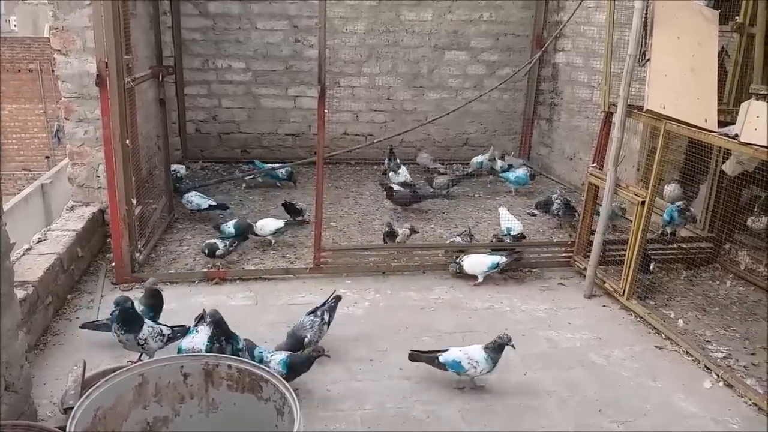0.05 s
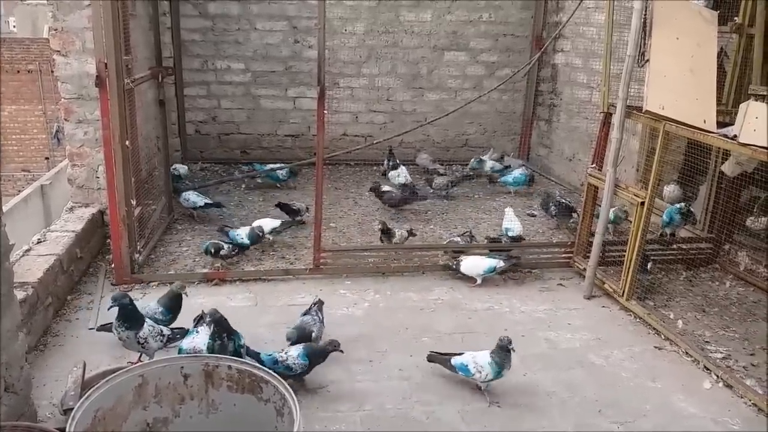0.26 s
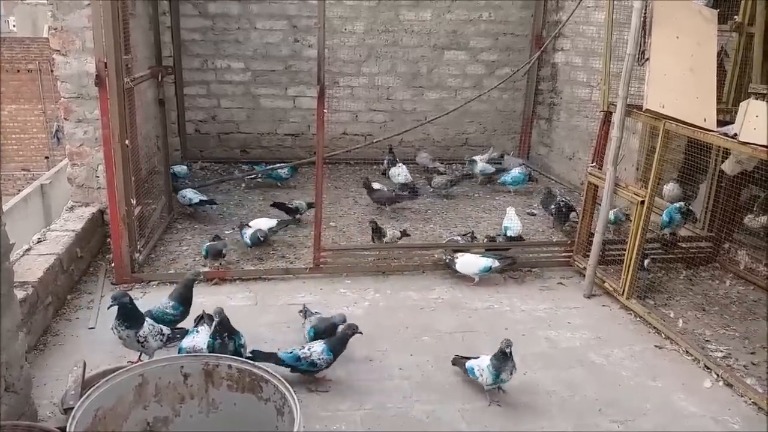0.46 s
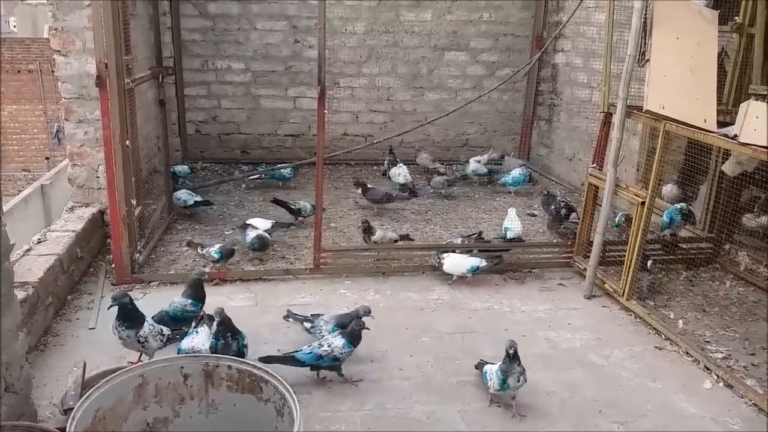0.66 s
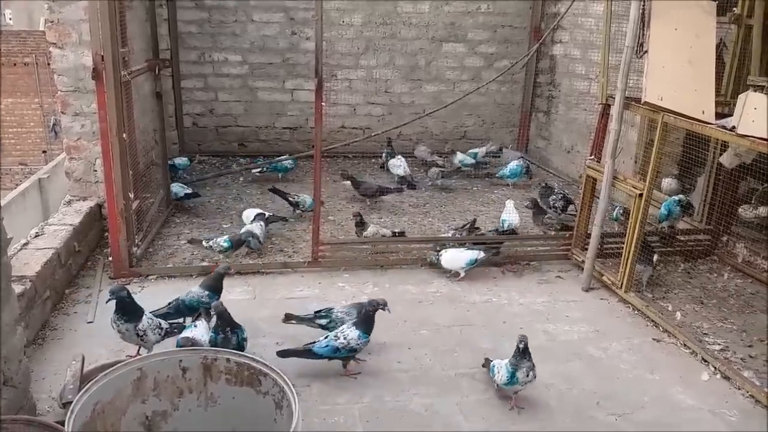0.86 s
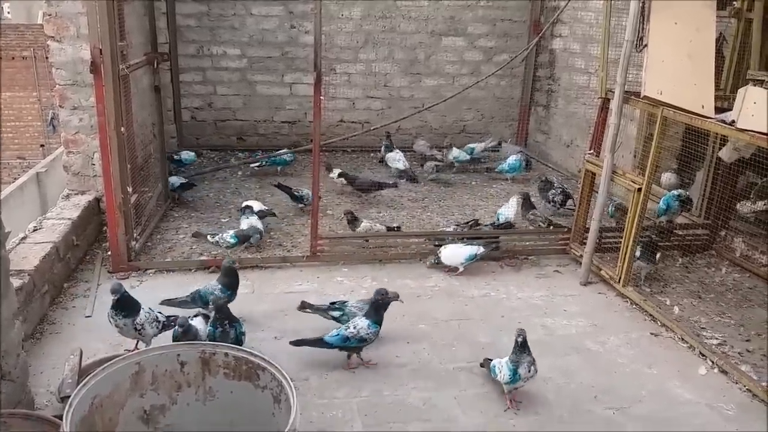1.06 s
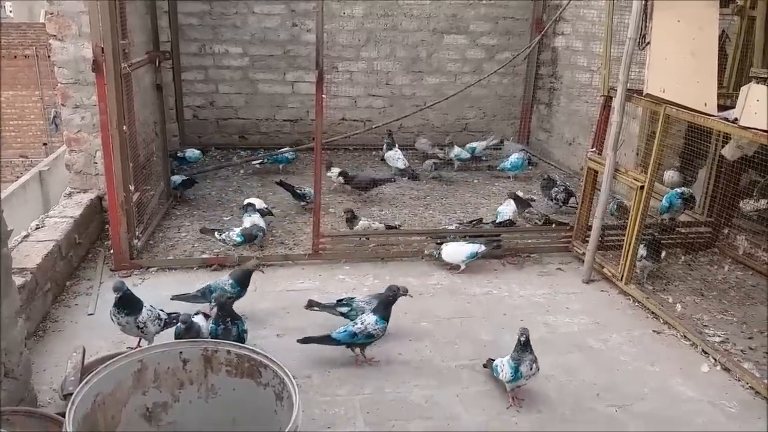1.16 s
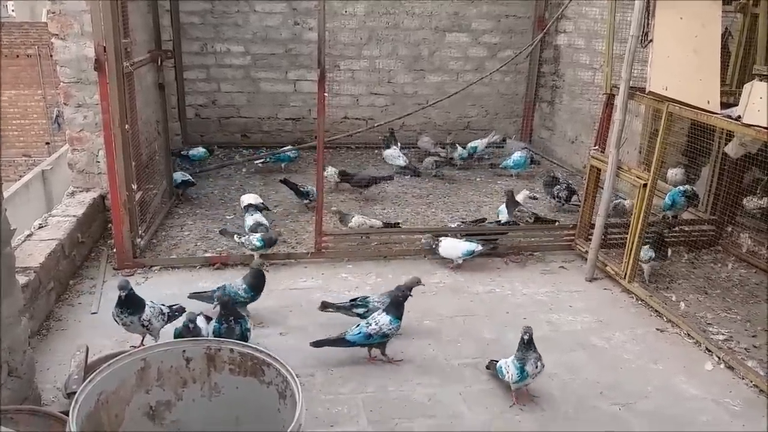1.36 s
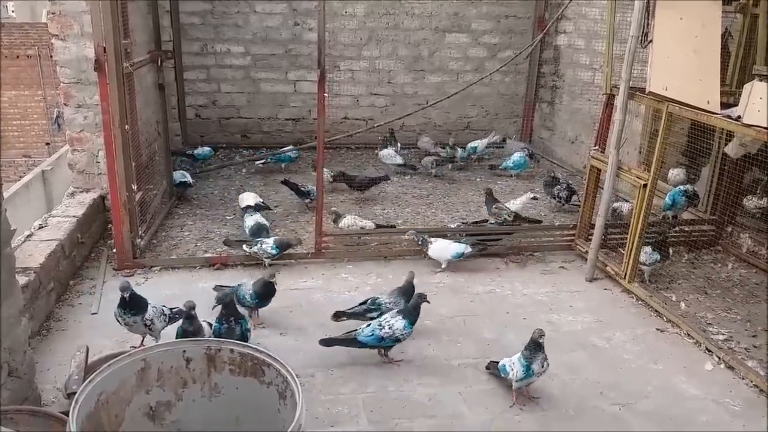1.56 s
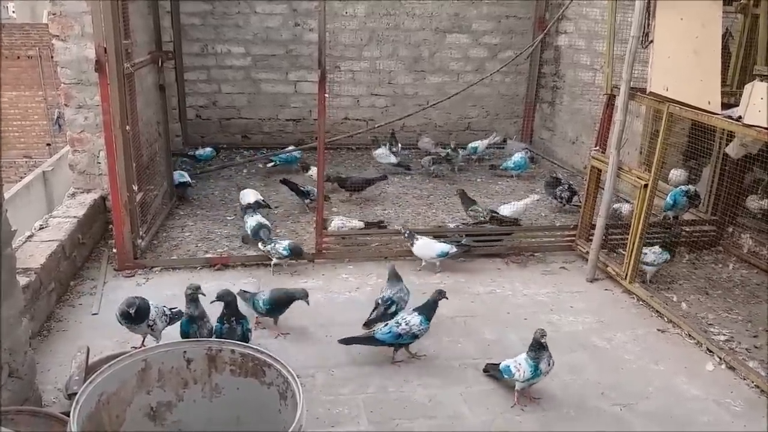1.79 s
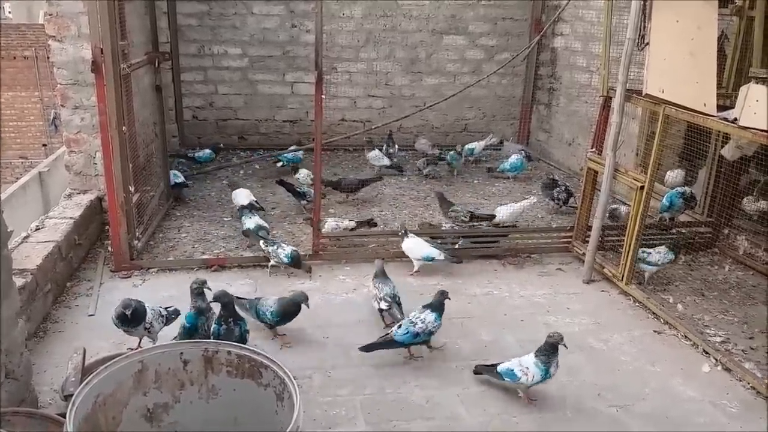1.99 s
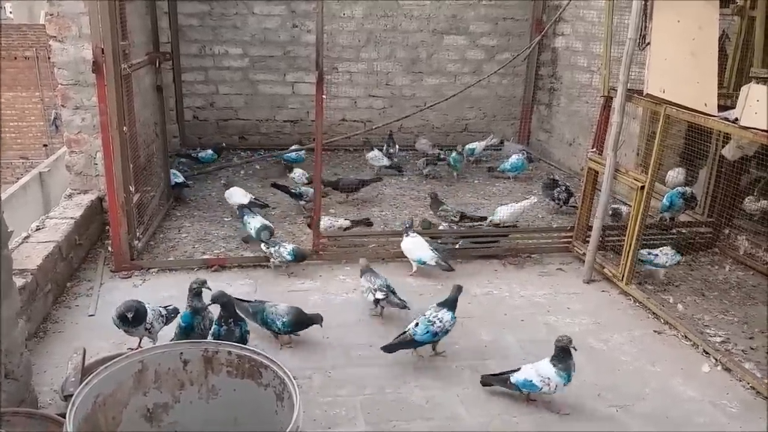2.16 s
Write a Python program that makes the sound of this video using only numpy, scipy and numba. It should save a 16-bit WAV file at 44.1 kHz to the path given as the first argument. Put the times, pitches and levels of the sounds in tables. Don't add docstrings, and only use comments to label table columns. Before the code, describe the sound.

Pigeons coo throughout, short grunts first, then a fluttering rolled coo and lower rolls; faint swishes of wings and feet, far chirps mostly right, dull motor and town rumble, short wall echo, slightly degraded treble, abrupt click.

```python
import sys
import numpy as np
from scipy import signal
from scipy.fft import rfft, irfft
from scipy.io import wavfile
from scipy.ndimage import uniform_filter1d
from numba import njit

SR = 44100
rng = np.random.default_rng(int(sys.argv[2]) if len(sys.argv) > 2 else 0)


def master_out(mix):
    frames = np.transpose(np.atleast_2d(mix))
    ceiling = np.clip(frames, -1, 1)
    pcm = np.round(ceiling * 32767).astype(np.int16)
    wavfile.write(sys.argv[1], SR, pcm)


def invert_db(x):
    u = np.asarray(x, float) / 20
    return 10 ** u


N = 98387
T = np.arange(N) / SR

# (time [s], level [dB])
MOTOR_THROB = [
    (0, -54.5),
    (0.298, -45),
    (.66, -47.5),
    (.75, -43.5),
    (.95, -47.5),
    (1.1, -39.5),
    (1.6, -45),
    (1.721, -57.5),
    (1.9, -43),
    (2.18, -53),
]


@njit
def svf(x, hz, width):
    y, band, low = np.empty(len(x)), 0., 0.
    g, damping = np.tan(np.pi * hz / SR), width / hz
    for i in range(len(x)):
        v = (band + g * (x[i] - low)) / (1 + g * (g + damping))
        band = 2 * v - band
        low = low + 2 * g * v
        y[i] = damping * v
    return y


def band_noise(hz):
    return svf(svf(rng.standard_normal(N), hz, hz / 3), hz, hz / 2)


def walk(rate, size=N):
    hold = int(SR / rate)
    steps = np.repeat(rng.standard_normal(size // hold + 1), hold)
    return 1.305 * uniform_filter1d(uniform_filter1d(steps, hold), hold)[:size]


def unit(x):
    return x / np.sqrt(np.mean(x ** 2))


def colour(table, hz):
    table_hz, table_db = np.array(table).T
    return np.interp(np.log(hz), np.log(table_hz), table_db)


def glide_tone(hz):
    return np.sin(2 * np.pi * np.cumsum(hz) / SR)


def throat_notes(table, attack, release, sag_db, roll_hz, depth, wander, flutter_db):
    overtone_db, restart_rad = -37, 1.83
    out = np.zeros(N + SR)
    for start, length, start_hz, end_hz, db in table:
        n = int(length * SR)
        u = np.arange(n) / n
        edge = np.clip(np.minimum(u / attack, (1 - u) / release), 0, 1)
        beats = 0.32 + np.cumsum(roll_hz * (1 + 0.198 * walk(41.0, size=n))) / SR
        restart = rng.standard_normal(200)[beats.astype(int)]
        slip = uniform_filter1d(depth * restart_rad * restart, size=150)
        hz = (start_hz + (end_hz - start_hz) * u) * (1 + wander * walk(66.3, size=n))
        phase = slip + 2 * np.pi * np.cumsum(hz) / SR
        valve = 1 - depth * np.cos(np.pi * beats) ** 2
        tone = np.sin(phase) + invert_db(overtone_db) * np.sin(2 * phase)
        gain = invert_db(db + 5.5 + sag_db * u ** 0.78 + flutter_db * walk(41.4, size=n))
        i = max(int(start * SR), 0)
        out[i:i + n] += tone * valve * gain * np.sin(edge * np.pi / 2) ** 2
    return out[:N]


def coos():
    # (start [s], length [s], start pitch [Hz], end pitch [Hz], level [dB])
    swoop_table = [(0, 0.044, 502.5, 369, -45), (.168, 0.051, 479.7, 352, -39), (.21, 0.05, 285, 264, -42),
                   (.37, 0.14, 240, 249.3, -42.5), (.37, .06, 712, 712, -54.5),
                   (.44, 0.046, 669, 652, -49.5), (.61, 0.084, 539, 531, -50.5),
                   (.69, 0.071, 519.5, 471, -48.5), (.77, .075, 640, 710, -55), (.87, 0.058, 418, 458, -50),
                   (1.45, 0.034, 703, 714, -49.5), (1.58, .1, 280, 233, -46), (1.6, 0.072, 479, 429, -42.5),
                   (1.645, .075, 410, 330, -49), (1.68, 0.11, 568, 560, -59.5), (1.77, .045, 540, 480, -47),
                   (1.795, .095, 475, 400, -32)]
    grunt_table = [
        (.198, 0.044, 348.6, 297, -32.5),
        (.279, 0.024, 340, 320, -40),
        (1.032, 0.032, 325, 310, -32),
        (1.041, .05, 430, 429, -41),
        (1.06, .055, 344, 336, -37.5),
        (1.146, 0.073, 362, 339, -29.5),
        (1.146, 0.074, 452, 440, -45),
        (1.842, .045, 385, 350, -29),
    ]
    quick_table = [(.24, 0.083, 370, 300, -41.5), (.235, .08, 450, 470, -41), (.34, .095, 400, 480, -41.5),
                   (.445, .069, 460, 436, -41.5), (0.41, 0.058, 370, 340, -44), (.55, .07, 275, 310, -41.5),
                   (.71, 0.083, 300, 314, -45.5), (.57, .054, 460, 457, -48), (1.44, .15, 430, 440, -46.5),
                   (1.872, .11, 290, 275, -34.5), (1.975, .09, 310, 290, -31.5),
                   (2.055, .085, 285, 280, -34), (2.14, 0.068, 285, 285, -39), (1.885, .11, 410, 410, -37),
                   (1.99, 0.079, 400, 400, -42), (2.07, .13, 420, 430, -41.5), (1.89, 0.34, 530, 535, -52),
                   (.29, .08, 290, 340, -48), (.61, .1, 350, 320, -50), (.77, .1, 380, 400, -52),
                   (.96, .075, 430, 400, -52), (1.57, .12, 400, 380, -50)]
    slow_table = [
        (.508, 0.13, 375, 375, -36),
        (.70, 0.12, 389.6, 369, -40),
        (.86, 0.12, 280, 335, -45),
        (1.23, 0.076, 384, 356, -49.5),
        (1.345, 0.06, 320, 340, -44),
        (1.55, .085, 325, 309, -39),
    ]
    beat_table = [
        (1.393, 0.019, 366, 360, -29.5),
        (1.411, 0.02, 365, 363, -34),
        (1.438, .024, 360, 350, -32),
        (1.462, .022, 344, 340, -32),
        (1.487, 0.025, 323, 315, -33),
        (1.51, 0.02, 320, 318, -34),
        (1.528, 0.023, 327, 318, -37.5),
        (1.877, .016, 320, 290, -30),
    ]
    wander = 0.024
    voice = throat_notes(swoop_table, .55, 0.21, 0, 50, 0.49, wander / 2, 0.74)
    voice += throat_notes(grunt_table, 0.092, .15, -12.5, 55, 0.31, wander / 3, 1.0)
    voice += throat_notes(quick_table, 0.068, 0.22, 0.41, 61.87, 0.6, .012, 1.3)
    voice += throat_notes(slow_table, .07, .12, -9, 42, .7, .013, 1.6)
    voice += throat_notes(beat_table, 0.26, .45, -4, 30, 0, wander / 3, 0.55)
    throat = signal.butter(4, (225, 780), "bandpass", fs=SR, output="sos")
    return signal.sosfilt(throat, voice)


def motor():
    # (pitch [Hz], level [dB])
    tone_table = [(62, -11.5), (102, 0.5), (123, -5), (146, -9.5)]
    s, db = np.array(MOTOR_THROB).T
    hum = 0
    for hz, tone_db in tone_table:
        flicker = invert_db(tone_db + 1.83 * walk(14.15))
        hum = hum + flicker * glide_tone(hz * (1 + 0.0412 * walk(12)))
    return unit(hum) * invert_db(np.interp(T, s, db) + 1.23)


def town():
    # (pitch [Hz], level [dB per Hz])
    town_colour = [(36, -36.5), (60, 2), (110, -0.5), (200, -3), (400, -10.5), (1000, -20.5), (5000, -31),
                   (9000, -40), (15800, -36)]
    out = 0
    swell = walk(4.2) + 0.12 * np.interp(T, *np.array(MOTOR_THROB).T)
    tilt = invert_db(np.array([[.8], [-.8]]))
    for hz in 32 * 2 ** np.arange(0, 9, .4):
        mid = band_noise(hz) * tilt
        side = np.clip(hz / 660.0, .25, 1) * band_noise(hz) * np.array([[1], [-1]])
        db = colour(town_colour, hz) + 1.63 * swell + 1.08 * walk(7.4)
        out = out + invert_db(db) * (mid + side)
    return unit(out) * invert_db(-48.5)


def rustles():
    # (peak time [s], length [s], level [dB], brightness [dB per octave])
    swishes = np.array([(0.237, 0.043, -67, 4), (0.405, 0.088, -65.5, -3), (0.478, 0.13, -63.5, -1),
                        (0.561, 0.082, -58.5, -1), (0.629, 0.11, -59, -1.5), (0.716, 0.13, -68, -1),
                        (0.871, 0.12, -52.5, -3), (0.961, 0.094, -65, -1.5), (1.062, 0.022, -60.5, -2),
                        (1.107, 0.095, -61, -3), (1.277, 0.095, -50, 1), (1.457, 0.086, -48.5, -2),
                        (1.56, 0.089, -63.5, -3), (1.646, 0.08, -68, 0.5)])
    # (pitch [Hz], level [dB per Hz])
    feather_colour = [(350, -32), (600, -9.5), (1400, -8.5), (1890, -6.5), (2110, -7), (3100, -4.5),
                      (9390, -12.5), (10900, -0.5), (15800, -19)]
    peak, length, level, brightness = (swishes[:, [i]] for i in range(4))
    u = (T - peak) / length
    swell = np.exp(-np.where(u < 0, u / .19, u / .48) ** 2)
    grain = invert_db(3.2 * walk(150))
    out = 0
    for hz in 600 * 2 ** np.arange(0, 4.8, .4):
        gain = (swell * invert_db(level + brightness * np.log2(hz / 4000))).sum(axis=0)
        noise = np.array([band_noise(hz), band_noise(hz)])
        out = out + noise * gain * invert_db(colour(feather_colour, hz) + 2.3 * walk(31.2))
    return out * grain * invert_db(16.5)


def whistle():
    # (time [s], pitch [Hz], level [dB])
    s, hz, db = np.array([(1.66, 4450, -78), (1.72, 4650, -76), (1.75, 4850, -73), (1.79, 4820, -73),
                          (1.82, 4900, -65), (1.86, 5000, -76), (1.92, 4980, -72), (1.96, 5150, -74),
                          (1.975, 5480, -72), (2.005, 5600, -71), (2.035, 5280, -68), (2.07, 5120, -72),
                          (2.11, 5200, -64), (2.122, 5480, -71), (2.14, 5750, -70), (2.176, 5450, -74)]).T
    line = glide_tone(np.interp(T, s, hz) * (1 + .006 * walk(90)))
    return line * invert_db(np.interp(T, s, db, left=-120) + 3 + 1.8 * walk(45))


def chirps():
    # (start [s], length [s], start pitch [Hz], end pitch [Hz], level [dB])
    chirp_table = [(.395, .05, 5390, 5000, -56.5), (.44, 0.041, 3430, 3320, -65),
                   (.445, .045, 2800, 2740, -61.5), (.39, .04, 1860, 1804, -61),
                   (.545, .02, 5300, 5300, -58), (.55, .05, 6090, 6000, -60.5),
                   (.608, .04, 3300, 3194, -50), (.86, 0.047, 4410, 4410, -58.5),
                   (1.095, .025, 3100, 2994, -55), (1.12, 0.026, 3310, 3400, -56.5),
                   (1.215, 0.04, 3050, 3010, -55), (1.45, .025, 3100, 3100, -66)]
    peep_table = [(.4, 0.054, 3620, 3660, -65.5), (.555, .02, 4150, 4150, -65),
                  (.575, 0.032, 4200, 4070, -57), (.585, 0.027, 3650, 3650, -62),
                  (.577, 0.033, 1970, 1930, -63), (.612, 0.029, 3193, 3143, -59.5),
                  (1.04, .05, 4870, 4850, -68), (1.17, .04, 4930, 4830, -65),
                  (1.24, .037, 3130, 3080, -56.5), (1.272, .022, 5700, 5700, -58),
                  (1.275, 0.019, 3370, 3210, -57)]
    breath = .4 + walk(400)
    hoarse = throat_notes(chirp_table, .3, .4, -1.5, 170, .6, .015, 2.5) * breath
    clear = throat_notes(peep_table, .25, .3, 0, 60, .2, .003, 1.5)
    return hoarse + clear + whistle()


def yard(x):
    t60_s, gap_s, level_db = .18, .007, -13
    t = T[:SR // 2]
    tail = rng.standard_normal((2, len(t))) * invert_db(-60 * t / t60_s) * (t > gap_s)
    tail = tail / np.sqrt((tail ** 2).sum(axis=1, keepdims=True))
    return invert_db(level_db) * signal.fftconvolve(x[None], tail)[:, :N]


def scene():
    pan_db, coo_lag_s, motor_lag_s = 2, 0.00022, 0.00056
    voice, far, hum = coos(), chirps(), motor()
    late_voice = np.interp(T - coo_lag_s, T, voice)
    near = np.array([late_voice * invert_db(pan_db / 2), voice * invert_db(-pan_db / 2)])
    late_hum = np.interp(T - motor_lag_s, T, hum)
    hum = np.array([hum * invert_db(-3.5), late_hum * invert_db(-5.5)])
    far_sides = far * np.array([[.3], [1.2]])
    return near + yard(voice) + far_sides + yard(far) + rustles() + hum + town()


def streaks(x):
    streak_db, hole_share, streak_hz = 4.5, .05, 3000
    hz, _, z = signal.stft(x, SR, nperseg=1024)
    frames = z.shape[2] // 2 + 1
    line = invert_db(streak_db * rng.standard_normal((len(hz), frames)))
    kept = rng.random((len(hz) // 16 + 1, frames)) > hole_share
    kept = np.repeat(kept, 16, axis=0)[:len(hz)]
    share = np.clip(hz / streak_hz - 1, 0, 1)[:, None]
    gain = line ** np.clip(share + .5, 0, 1) * (1 - share * ~kept)
    gain = gain / np.sqrt(np.mean(gain ** 2, axis=1, keepdims=True))
    gain = np.repeat(gain, 2, axis=1)[:, :z.shape[2]]
    gain = np.where(hz[:, None] > streak_hz / 3, gain, 1)
    return signal.istft(z * gain, SR, nperseg=1024)[1][:, :N]


def roll_off(x):
    return signal.sosfilt(signal.butter(12, 16180, fs=SR, output="sos"), x)


def record(dry):
    # (start [s], length [s], lost above [Hz])
    dropout_table = [
        (1.154, 0.03, 6100),
        (1.377, 0.042, 3730),
        (1.823, 0.027, 6200),
        (1.872, .05, 6800),
        (1.845, .03, 13200),
        (1.915, .042, 13500),
        (1.972, 0.025, 5600),
        (1.952, 0.1, 6020),
    ]
    dropout_db = -45
    stop_s, click_db, tail_db, fade_s = 2.1765, -27, -16, .012
    mix = streaks(dry)
    hz = np.arange(N // 2 + 1) * SR / N
    for start, length, edge_hz in dropout_table:
        shut = np.clip(np.minimum(T - start, start + length - T) / .006 + .5, 0, 1)
        treble = irfft(rfft(mix) * (hz > edge_hz), N)
        mix = mix - (1 - invert_db(dropout_db)) * shut * treble
    after = T - stop_s
    mix = mix + (invert_db(click_db) - mix[:, [int(stop_s * SR)]]) * np.exp(-(after / .0007) ** 2)
    gate = np.where(after < 0, 1, invert_db(tail_db) * np.exp(-(after / fade_s) ** 2 / 2))
    mix = irfft(rfft(mix * gate) * (hz < 15850), N)
    return roll_off(mix)


dry = scene()
out = record(dry)
master_out(out)
```